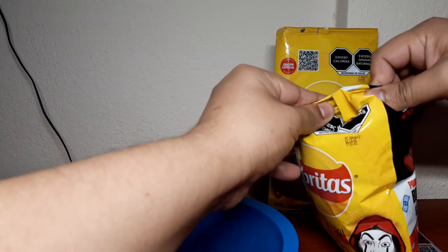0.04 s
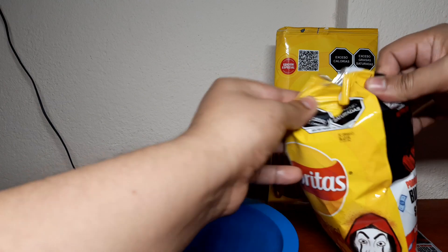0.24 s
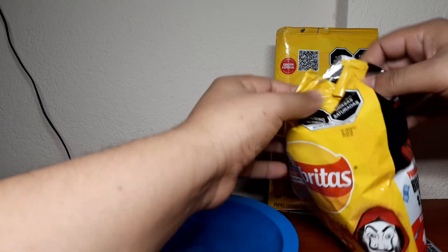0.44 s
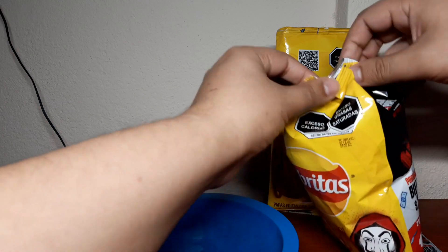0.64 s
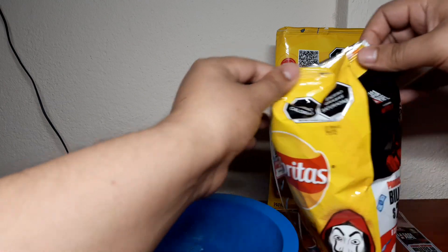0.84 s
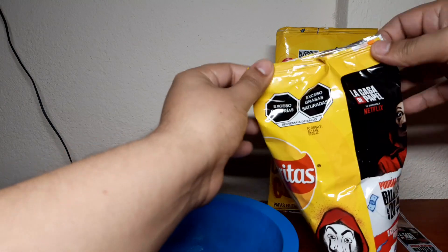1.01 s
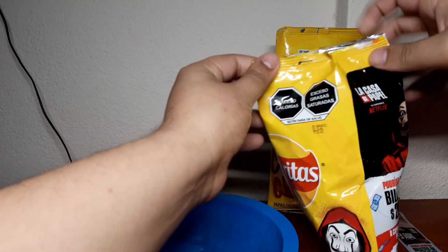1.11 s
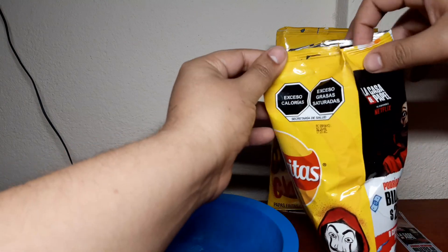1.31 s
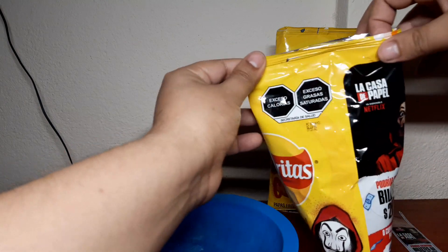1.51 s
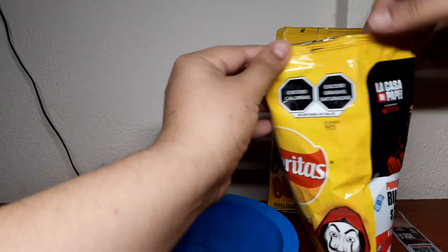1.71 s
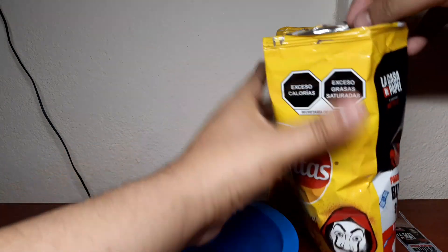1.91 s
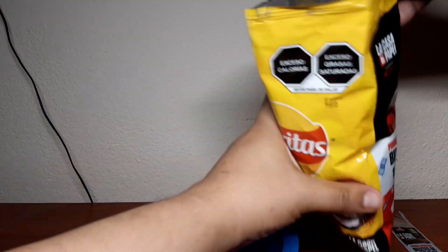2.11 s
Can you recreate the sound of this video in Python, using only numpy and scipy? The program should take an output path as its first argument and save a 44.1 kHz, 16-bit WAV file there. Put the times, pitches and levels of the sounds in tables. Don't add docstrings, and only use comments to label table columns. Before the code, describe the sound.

Close phone microphone in a small room: crisp bag foil crackles and rips in two strong bursts within the first second, then thins to light crinkles with sharp pops near the middle and end, over faint low rumble.

```python
import sys
import numpy as np
from scipy import signal
from scipy.fft import rfft, irfft, next_fast_len
from scipy.io import wavfile
from scipy.ndimage import uniform_filter1d

SR = 44100
rng = np.random.default_rng(int(sys.argv[2]) if len(sys.argv) > 2 else 0)


def gain_from_db(level_db):
    decades = np.asarray(level_db, float) / 20
    return 10 ** decades


def wav_out(sig):
    wavfile.write(sys.argv[1], SR, np.round(np.clip(np.atleast_2d(sig).T, -1, 1) * 32767).astype(np.int16))


N = 94815

# (time [s], fine crackle level [dB], body crumple level [dB])
GRIP = [(0, -50.5, -51.5), (.22, -46.5, -45.5), (.37, -34.5, -42), (.55, -37.5, -43), (.59, -51, -55),
        (.74, -55.5, -67), (.76, -40.5, -39), (.86, -38, -42.5), (1.05, -41, -44), (1.19, -59, -54.5),
        (1.33, -65.5, -54), (1.53, -45, -45.5), (1.66, -60.5, -58), (1.74, -48.5, -45.5), (1.87, -55, -47),
        (1.99, -72, -57.5), (2.03, -50, -47), (2.15, -59, -46.5)]
# (frequency [Hz], density [dB per Hz])
FOIL_SPECTRUM = [(1290, -40), (2200, -1.5), (3040, 2.5), (3360, 2), (5220, -1.5), (6980, -0.5),
                 (13700, -4.5), (16000, -17)]
# (frequency [Hz], density [dB per Hz])
BODY_SPECTRUM = [(88, -68), (150, -9.5), (184, 0), (528, 0.5), (1370, -9), (1990, -6), (2200, 12),
                 (2860, -35), (4840, -120)]
FOIL_CYCLES, BODY_CYCLES = 15.2, 5.36


def rms_one(x):
    return x / np.sqrt(np.mean(x ** 2) + 1e-20)


def in_time(rows):
    s, *columns = np.transpose(rows)
    return [np.interp(np.arange(N) / SR, s, column) for column in columns]


def at_hz(points, hz):
    point_hz, point_db = np.array(points).T
    return np.interp(np.log(hz), np.log(point_hz), point_db)


def drift(rate_hz):
    r = np.exp(-2 * np.pi * rate_hz / SR)
    settle = 9000
    noise = rng.standard_normal(N + settle)
    return rms_one(signal.lfilter([1], [1, -2 * r, r * r], noise)[settle:])


def ring(clicks, hz, cycles):
    r = gain_from_db(-60 * hz / (cycles * SR))
    w = 2 * np.pi * hz / SR
    struck = signal.lfilter([1, 0, -1], [1, -2 * r * np.cos(w), r * r], clicks + 1e-18)
    return np.sqrt(1 - r * r) * struck


def coloured(spectrum):
    hz = np.arange(N // 2 + 1) * SR / N + 1
    white = rfft(rng.standard_normal(N))
    return rms_one(irfft(white * gain_from_db(at_hz(spectrum, hz)), N))


def grains(per_s, spread_db, clump_db, spectrum, cycles, top_hz=15000, strip_hz=None, tilt_db=0, count=20):
    strip_db, strip_octaves = 8.0, .28
    clump = clump_db * (drift(150) + .4 * drift(30))
    click_db = clump + spread_db * np.minimum(rng.exponential(1, N), 5)
    sizes = gain_from_db(click_db) * rng.choice([-1, 1], N)
    clicks = sizes * (rng.random(N) < per_s * gain_from_db(clump) / SR)
    dealt = rng.integers(0, count, N)
    out = 0
    for k, hz in enumerate(np.geomspace(spectrum[1][0], top_hz, count)):
        db = at_hz(spectrum, hz) + 10 * np.log10(hz)
        db = db + tilt_db * max(np.log2(hz / 5000), 0)
        if strip_hz is not None:
            octaves = np.log2(hz / strip_hz)
            db = db + strip_db * np.exp(-.5 * (octaves / strip_octaves) ** 2)
        out = out + ring(clicks * (dealt == k) * gain_from_db(db), hz, cycles)
    return out / np.sqrt(uniform_filter1d(out ** 2, size=5000) + 1e-20)


def bursts(rows, spectrum, cycles, own_cycles, own_db, per_s, main_s, tail_s, tail_db, top_hz, pouch_db=-4):
    pouch_hz, pouch_cycles = 1287, 9.0
    tilt_db, above_db = 1, 2.5
    rise_share = 0.14
    length = 4000
    out, t = np.zeros(N + SR), np.arange(length) / SR
    pitches = np.geomspace(spectrum[1][0], top_hz, 9)
    gains = gain_from_db(at_hz(spectrum, pitches) + 10 * np.log10(pitches / pitches[4]))
    decay = np.exp(-t / main_s) + gain_from_db(tail_db) * np.exp(-t / tail_s)
    shape = decay * (1 - 0.56 * np.exp(-t / (rise_share * main_s)))
    for s, db, hz in rows:
        draw = rng.standard_normal((10, length)) * (rng.random((10, length)) < per_s / SR)
        draw[range(10), (rng.random(10) * SR / per_s).astype(int)] += 1
        slips = draw * shape
        facets = 0
        for gain, pitch, run in zip(gains, pitches, slips):
            octaves = np.log2(pitch / hz)
            loss_db = tilt_db * abs(octaves) + above_db * max(octaves, 0)
            facets = facets + gain * gain_from_db(-loss_db) * ring(run, pitch, cycles)
        own = gain_from_db(own_db) * rms_one(ring(slips[9], hz, own_cycles))
        pouch_gain = gain_from_db(pouch_db - 2 * tilt_db * abs(np.log2(hz / pouch_hz)))
        pouch = pouch_gain * rms_one(ring(slips[0], pouch_hz, pouch_cycles))
        sound = rms_one(facets) + own + pouch
        i = int(s * SR)
        out[i:i + length] += gain_from_db(db) * sound / np.abs(sound).max()
    return out[:N]


def foil_bursts(rows, own_db, main_s, tail_db, top_hz, pouch_db=-4):
    return bursts(rows, FOIL_SPECTRUM, FOIL_CYCLES, 14.0, own_db, 3000, main_s, 0.01, tail_db, top_hz, pouch_db)


def rips():
    # (time [s], level [dB], pitch of the taut strip [Hz])
    peels = [
        [(.09, -40, 3550), (.105, -28, 3370), (.148, -32.5, 3470), (.16, -33.5, 11500), (.195, -40, 12300)],
        [(.25, -44, 6500), (.28, -26.5, 5000), (.312, -19, 3400), (.325, -18.5, 9900), (.35, -18.5, 11300),
         (.358, -34, 10600), (.375, -31, 7100)],
        [(.87, -56, 6800), (.905, -40, 6750), (.925, -29, 7000), (.95, -26.5, 6860), (.975, -29.5, 6200),
         (1.04, -36.5, 4430), (1.055, -49, 5000)],
        [(2.006, -49, 12600), (2.018, -42, 13100), (2.03, -65, 9000)],
    ]
    rows = []
    for peel in peels:
        (start, _, first_hz), (end, _, last_hz) = peel[0], peel[-1]
        rows += [(start - .005, -80, first_hz), *peel, (end + 0.013, -80, last_hz)]
    db, hz = in_time(rows)
    return gain_from_db(db) * grains(14000, 2.6, .7, FOIL_SPECTRUM, 20.0, strip_hz=hz, count=28)


def snaps():
    # (time [s], peak level [dB], facet
    # pitch [Hz])
    creases = [(0.0308, -25, 3980), (0.1138, -17.5, 3400), (0.1555, -22, 3320), (0.2234, -24, 3640),
               (0.2498, -30, 6600), (0.2648, -18.5, 7640), (0.278, -17.5, 9600), (0.2915, -13, 3550),
               (0.3942, -23, 3380), (0.4862, -24, 6100), (0.5153, -28.5, 3570), (0.6088, -28.5, 5840),
               (0.63, -27.5, 3070), (0.6709, -31.5, 9600), (0.702, -29, 4360), (0.7512, -23, 3800),
               (0.784, -23.5, 3300), (0.853, -24.5, 6800), (0.8732, -19.5, 6660), (0.8945, -12, 6550),
               (0.9104, -13, 3800), (0.9195, -11, 7000), (0.9447, -17, 7100), (0.9635, -11.5, 5900),
               (0.9924, -21, 6800), (1.0367, -15, 4080),
               (1.1096, -29, 4000), (1.1512, -37, 6240), (1.2355, -23, 3870), (1.3616, -31, 6060),
            (1.384, -35, 4420), (1.401, -27.5, 2850), (1.4461, -26, 4230), (1.4508, -19.5, 6160),
            (1.483, -24.5, 3400), (1.545, -22, 6400), (1.572, -31, 3840), (1.6768, -35, 3400),
            (1.7266, -29.5, 6300), (1.8133, -30, 3130), (1.833, -32, 2630), (1.8508, -27, 6700),
            (1.9342, -26.5, 7040), (2.081, -24, 5400), (2.1099, -24, 3830), (2.138, -30.5, 3200)]
    return foil_bursts(creases, own_db=1.5, main_s=0.0015, tail_db=-10.5, top_hz=15540)


def cracks():
    # (time [s], peak level [dB], facet pitch [Hz])
    pops = [(1.5142, -10, 3400), (1.5150, -10, 6300), (1.5168, -14, 3000), (1.6093, -19, 3300),
            (1.6105, -17, 10000), (1.9993, -26, 8000), (2.0023, -9, 4800), (2.0028, -12, 8000),
            (2.0063, -14, 5000), (2.013, -11, 7600), (2.0195, -22, 6000)]
    return foil_bursts(pops, own_db=6.0, main_s=.0009, tail_db=-19, top_hz=16300, pouch_db=-14)


def ticks():
    # (time [s], peak level [dB], facet pitch [Hz])
    small = [(0.0168, -40, 6300), (0.0665, -56, 4000), (0.0785, -29, 3640), (0.1922, -30, 8660),
             (0.3229, -12, 3600), (0.4478, -44, 6740), (0.4715, -32, 6100), (0.4809, -48, 6600),
             (0.5004, -21.5, 7450), (0.5413, -34, 6160), (0.5621, -36, 4730), (0.5691, -31, 8800),
             (0.636, -34, 2900), (0.6511, -45, 3400), (0.7111, -36, 3400), (0.7758, -39, 6100),
             (0.8053, -19.5, 6200), (0.8599, -40, 6200), (0.8839, -29, 7000), (0.8897, -39, 6840),
             (0.8983, -14, 6560), (0.9489, -14, 7000), (0.999, -24, 6440), (1.0148, -19.5, 4000),
             (1.0546, -33, 5400), (1.1298, -45, 5600), (1.1487, -35, 4300), (1.1709, -45, 2700),
             (1.2142, -34.5, 5800), (1.2455, -35, 6100), (1.2802, -39.5, 3100), (1.2989, -49, 3400),
             (1.3128, -57, 2800), (1.3362, -46, 3700), (1.3435, -48, 6700), (1.3496, -56, 6100),
             (1.4138, -34, 3220), (1.5521, -26, 3000), (1.5914, -44, 3300), (1.6316, -38, 3000),
             (1.6489, -34, 3840), (1.6902, -48, 5700), (1.7219, -39, 6700), (1.735, -37, 5870),
             (1.7548, -37, 6540), (1.7657, -34.5, 3200), (1.778, -33.5, 6760), (1.784, -36, 3250),
             (1.7897, -31, 6800), (1.8817, -47, 6400), (1.9289, -37, 6070), (2.0327, -32, 5060),
             (2.0404, -38, 3400), (2.0449, -29.5, 2470), (2.0611, -43, 3800), (2.0909, -43, 3400),
             (2.12, -35, 3120), (2.1425, -41, 3300)]
    return foil_bursts(small, own_db=6.5, main_s=0.0014, tail_db=-19, top_hz=15200, pouch_db=1)


def bunches():
    # (time [s], peak level [dB], facet pitch [Hz])
    groups = [
        (0.4316, -22, 3240),
        (0.8131, -15, 3530),
        (1.0315, -18.5, 4050),
        (1.2050, -32, 6300),
        (1.4924, -27, 3640),
        (1.9090, -31, 6700),
    ]
    return foil_bursts(groups, own_db=1.5, main_s=0.0047, tail_db=-29, top_hz=16000)


def crackle():
    db = in_time(GRIP)[0]
    dulling = 0.57
    return gain_from_db(db) * grains(8000, 2.8, 1.2, FOIL_SPECTRUM, FOIL_CYCLES, tilt_db=dulling * (db + 32.5))


def buckles():
    # (time [s], peak level [dB], panel pitch [Hz])
    panels = [(0.029, -33.5, 480), (0.223, -41, 516), (0.29, -18.5, 554), (0.329, -17, 1410),
              (0.369, -27.5, 775), (0.434, -23.5, 870), (0.509, -25.5, 513), (0.609, -29.5, 1470),
              (0.629, -27.5, 325), (0.702, -23, 1210), (0.558, -29, 300), (0.774, -33.5, 357),
              (0.806, -20, 1190), (0.958, -20, 1160), (1, -19.5, 493), (1.109, -36.5, 1300),
              (1.146, -33, 770), (1.171, -29.5, 1390), (1.234, -26.5, 770), (1.398, -31.5, 420),
              (1.516, -25.5, 770), (1.544, -30.5, 570), (1.597, -34, 248), (1.69, -31.5, 670),
              (2.043, -39, 430), (2.108, -31, 334)]
    sound = bursts(panels, BODY_SPECTRUM, BODY_CYCLES, own_cycles=6.0, own_db=2.5, per_s=700,
                   main_s=0.0054, tail_s=0.023, tail_db=-7, top_hz=2620)
    return signal.sosfilt(signal.butter(2, 1730, fs=SR, output="sos"), sound)


def crumple():
    db = in_time(GRIP)[1]
    return gain_from_db(db) * grains(1500, 2.5, 1.6, BODY_SPECTRUM, BODY_CYCLES, top_hz=1820)


def mouth(x):
    # (frequency [Hz], width [Hz], boost [dB])
    bands = [(1410, 96, 3), (1970, 540, -1.5), (3400, 167, 1), (6700, 600, 2)]
    for hz, width, db in bands:
        x = x + (gain_from_db(db) - 1) * signal.lfilter(*signal.iirpeak(hz, hz / width, fs=SR), x)
    return x


def bumps():
    # (time [s], peak level [dB], pitch [Hz], 60 dB decay [s], push direction [+1 or -1])
    pushes = [
        (.124, -26, 70, .07, -1),
        (.345, -38, 24, .15, 1),
        (.965, -40, 80, .08, 1),
        (1.2775, -29.5, 62, .06, 1),
        (2.014, -36, 65, .06, 1),
    ]
    out = np.zeros(N)
    for s, db, hz, t60, way in pushes:
        t = np.maximum(np.arange(N) / SR - s, 0)
        sagging = t + 0.0083 * (1 - np.exp(-t / 0.0018))
        out += way * gain_from_db(db + 3 - 60 * t / t60) * np.sin(2 * np.pi * hz * sagging)
    return signal.sosfilt(signal.butter(2, 266, fs=SR, output="sos"), out)


def room(x):
    t60_s, wall_cut_hz = 0.15, 2750
    size = next_fast_len(N + SR)
    w = 2 * np.pi * np.arange(size // 2 + 1) / size
    dull = 1 / (1 + 1j * w * SR / (2 * np.pi * wall_cut_hz))
    response = 0
    for k, delay_s in enumerate(rng.uniform(.008, .03, 8)):
        loop = gain_from_db(-60 * delay_s / t60_s) * dull * np.exp(-1j * w * int(delay_s * SR))
        response = response + (-1) ** k * loop / (1 - loop)
    return irfft(rfft(x, size) * response, size)[:N]


def background():
    # (frequency [Hz], density [dB per Hz])
    rumble = [(8.8, -27), (15, 5), (32, -3.5), (70, -6), (184, -14), (242, -17.5), (300, -10), (390, -50),
              (660, -120)]
    # (frequency [Hz], density [dB per Hz])
    hiss = [(300, 5), (1500, -19), (16000, -2)]
    # (time [s], level [dB])
    sway = [(0, -49.5), (.2, -44.5), (.4, -48), (.45, -49.5), (.6, -43.5), (.85, -47.5), (2.15, -48.5)]
    sway_db, = in_time(sway)
    lumps_db = 1.5 * drift(18)
    return gain_from_db(sway_db + lumps_db) * coloured(rumble) + gain_from_db(-69) * coloured(hiss)


def scene():
    no_bass = signal.butter(2, 3630, "high", fs=SR, output="sos")
    foil = signal.sosfilt(no_bass, rips() + crackle())
    bag = mouth(foil + snaps() + cracks() + ticks() + bunches() + buckles() + crumple())
    return (bag + gain_from_db(-12.5) * room(bag) + bumps() + background())[None]


def band_limit(x):
    return signal.sosfilt(signal.butter(12, 17000, fs=SR, output="sos"), x)


def record(dry):
    ceiling = .5
    rounded = ceiling * np.tanh(dry / ceiling)
    mix = signal.sosfilt(signal.cheby2(10, 30, 16100, fs=SR, output="sos"), rounded)
    return band_limit(mix)


dry = scene()
out = record(dry)
wav_out(out)
```